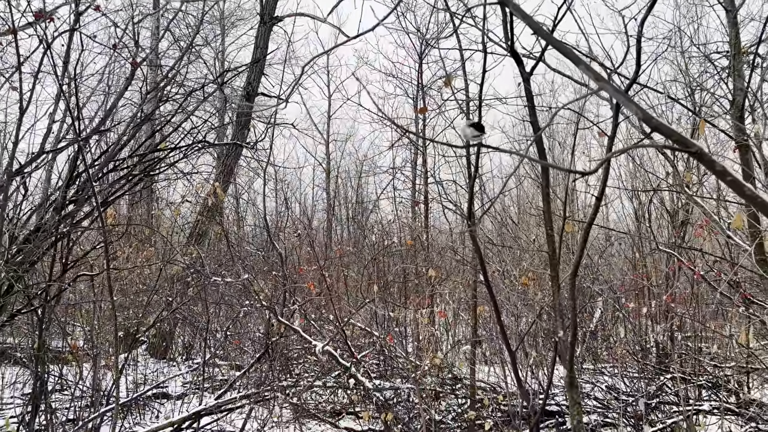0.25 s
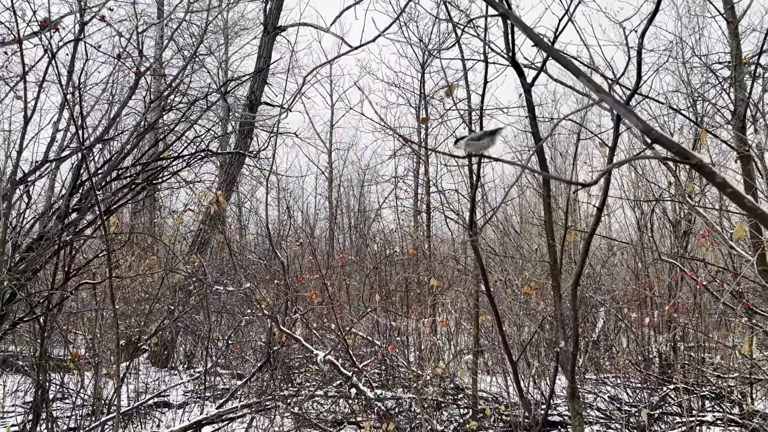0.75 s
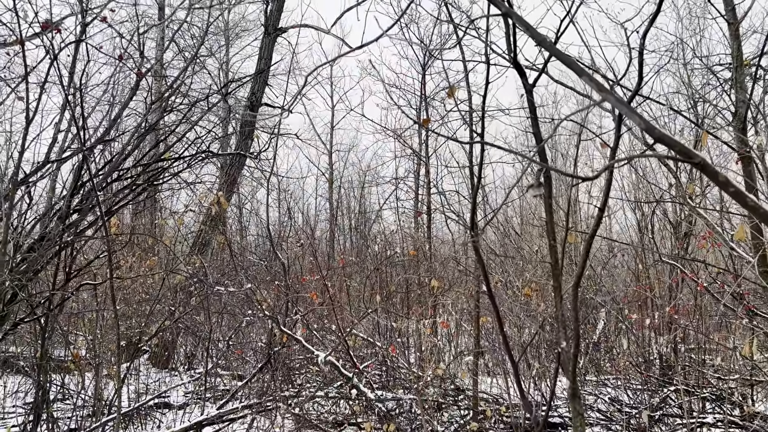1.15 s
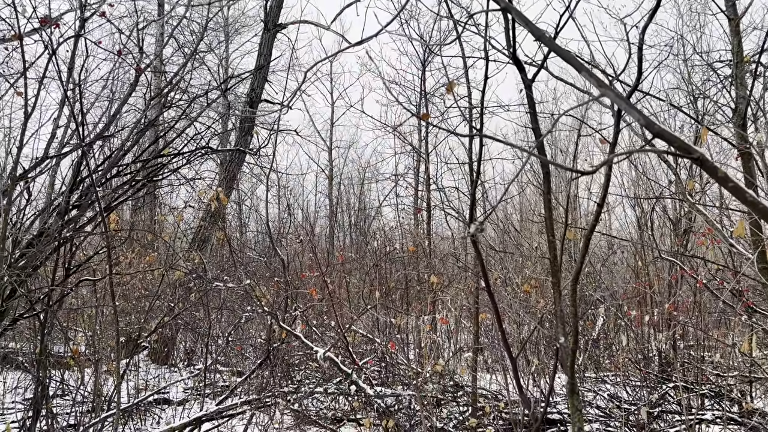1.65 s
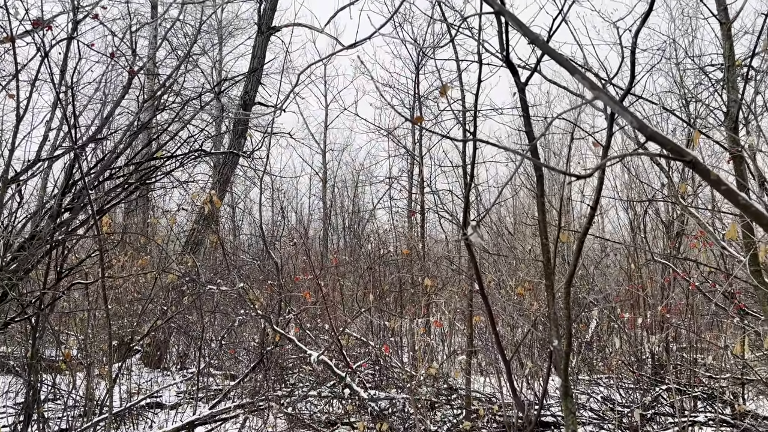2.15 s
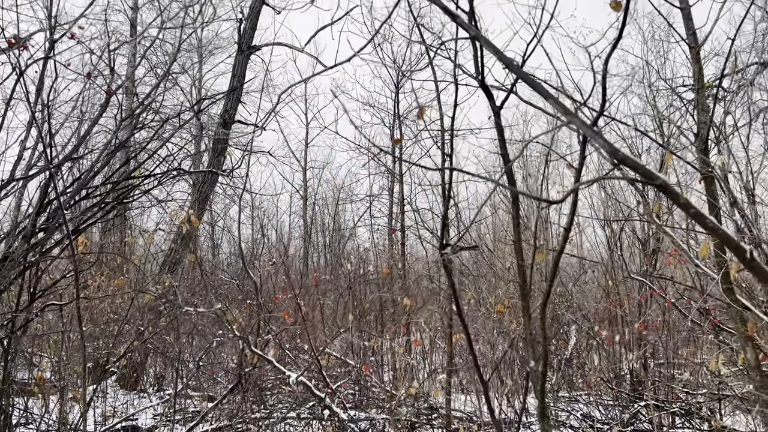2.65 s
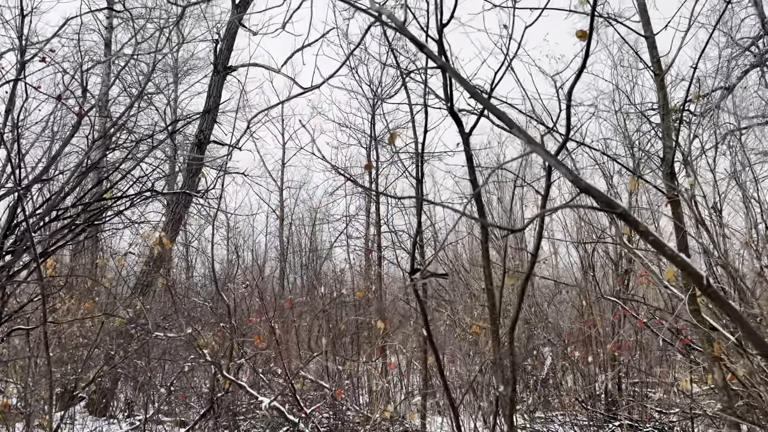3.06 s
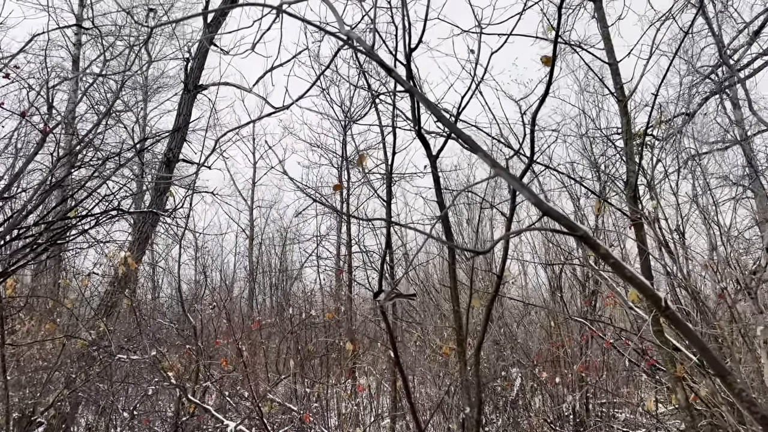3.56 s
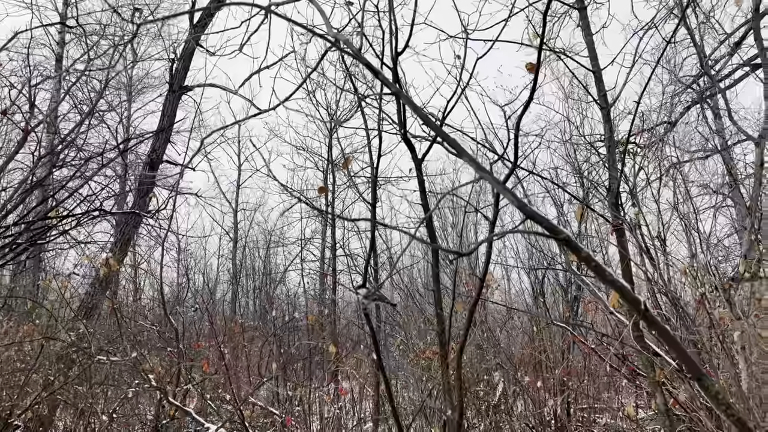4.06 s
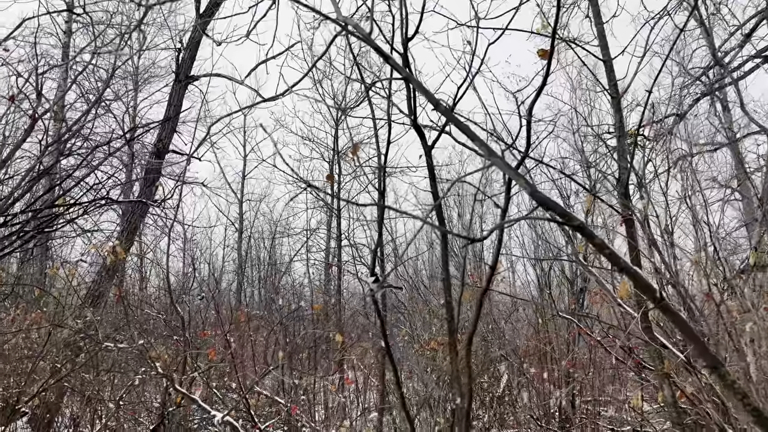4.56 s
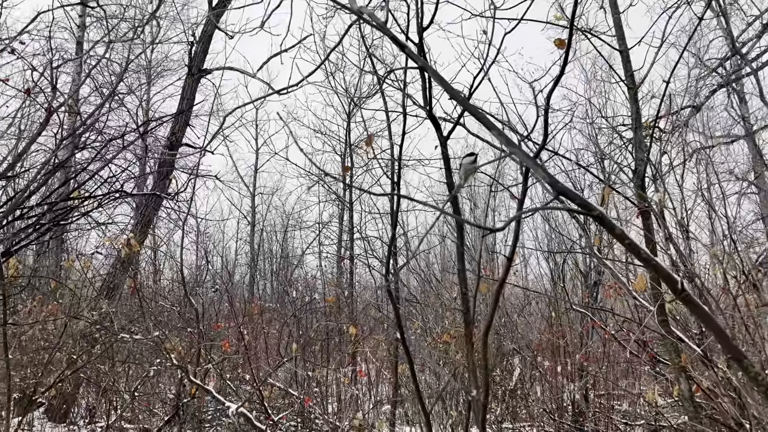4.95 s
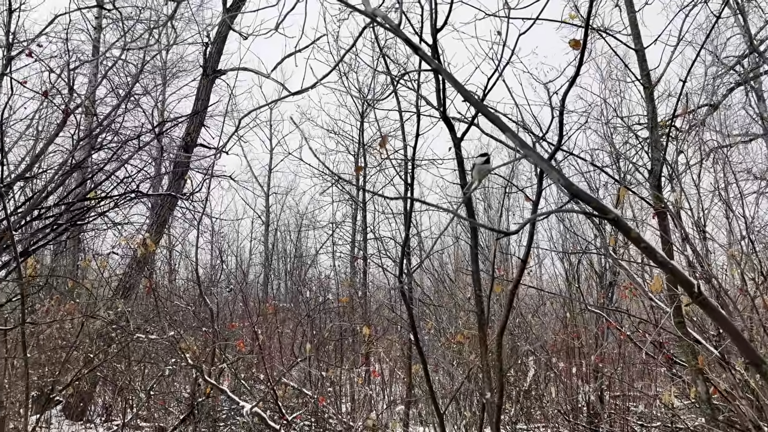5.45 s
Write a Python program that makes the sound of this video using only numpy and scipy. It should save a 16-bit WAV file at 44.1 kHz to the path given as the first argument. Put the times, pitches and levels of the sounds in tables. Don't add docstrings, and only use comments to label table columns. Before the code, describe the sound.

Handheld stereo pickup among bare snowy trees: two short pure whistles left of centre, tiny twig ticks and muffled wingbeats, then a quick chattering string of piercing chips sliding into buzzy nasal dee notes with short woodland echoes. Quiet follows, with low wind and extremely faint far birds. Fast wings whir before the last second, when drier, nearer chips and a final nasal call end the scene.

```python
import sys
import numpy as np
from scipy import signal
from scipy.fft import irfft
from scipy.io import wavfile
from scipy.ndimage import uniform_filter1d

SR = 44100
rng = np.random.default_rng(int(sys.argv[2]) if len(sys.argv) > 2 else 0)


def log_audio(samples):
    frames = np.atleast_2d(samples).T
    limited = np.clip(frames, -1, 1)
    pcm = np.round(limited * 32767).astype(np.int16)
    wavfile.write(sys.argv[1], SR, pcm)


def invert_db(level):
    return 10 ** (np.asarray(level, dtype=float) / 20)


N = 250929

PERCH_S = 5.0

# (start [s], length [s], top of fast voice [Hz], slow voice [Hz], level [dB])
FULL_CHIPS = [(1.413, 0.056, 7820, 2293, -31), (1.524, 0.04, 7374, 2206, -30.5),
              (1.628, 0.038, 7287, 2282, -29), (1.728, 0.035, 6980, 2206, -30.5)]
LEAN_CHIPS = [(1.478, 0.05, 8340, 2553, -38.5), (1.587, 0.041, 7750, 2555, -37),
              (1.691, 0.038, 7320, 2580, -33), (1.801, .036, 7220, 2405, -31.5),
              (5.46, 0.042, 7600, 2360, -32)]
LATE_CHIPS = [(5.136, 0.043, 7444, 2390, -46), (5.18, .057, 7685, 2607, -36.5),
              (5.345, .043, 8066, 2388, -30)]
THIN_CHIPS = [(5.134, 0.056, 8040, 2380, -48)]
FAR_CHIPS = [(0.678, 0.031, 7570, 2340, -82), (3.236, 0.032, 7320, 1860, -85.5),
             (3.412, 0.036, 7110, 1735, -82.5), (3.467, 0.033, 6850, 1900, -89),
             (3.577, 0.033, 6860, 1883, -78), (3.638, 0.032, 6680, 1920, -86.5)]
# (climb [Hz], scoop [share of climb], swell [dB], sum tones [dB])
FULL_MANNER = (850, 1.3, 1.3, 5.7)
LEAN_MANNER = (950.5, 1.6, -5, -0.5)
LATE_MANNER = (901, 0.9, -2, -1)
THIN_MANNER = (162, 5.5, -2, -30)
FAR_MANNER = (696, 0.5, -8, 0)
PLUNGE = [(.3, .58, 0.62), (.62, .88, 0.84), (1.001, 1, 0.97)]
# (time [s], fast voice [Hz], slow voice [Hz], level [dB])
ARCH = [
    (5.568, 2887, 2238, -58),
    (5.578, 4730, 2052, -40.5),
    (5.588, 5120, 1997, -37.5),
    (5.6, 4730, 1818, -39),
    (5.612, 3570, 1910, -44),
    (5.624, 2210, 1880, -64),
]
# (fast voice [multiple], slow voice [multiple], level [dB])
CHIP_TONES = [(1, 0, 0), (1, -1, -35), (0, 1, -40), (1, 1, -9.), (1, 2, -33.), (2, 0, -21.)]
LATE_TONES = [(2, -1.1, -31.5)]
ARCH_TONES = [(1, 0, 3), (1, 1, 3.5), (0, 1, -12), (2, 1, -13), (2, -1, -17), (0, 4, -14)]
FAR_TONES = [(1, 0, 4), (1, 0.89, -10.5)]
# (start [s], length [s], crest of fast voice [Hz], slow voice [Hz], level [dB])
GARGLES = [
    (1.829, .062, 3874, 2329, -42),
    (1.894, .085, 3226, 2033, -42),
]
GARGLE_MINUS_DB = [4, -3]
# (start [s], length [s], crest of fast voice [Hz], crest of slow voice [Hz], level [dB])
FIRST_DEE = [(1.965, 0.112, 1759, 2192, -43)]
DEES = [
    (2.134, 0.17, 1726, 2185, -44.5),
    (2.366, 0.17, 1681, 2142, -43.5),
    (2.61, .15, 1693, 2120, -45),
    (5.645, 0.18, 1663, 2164, -39),
]
DEE_CRESTS = [.55, .4, .28, 0.51]
DEE_HOARSE = [.2, .17, .42, .22]
# (frequency [Hz], level [dB])
THROAT = [(1200, -42), (1700, -17.5), (2150, -13), (2700, -9), (3400, -0.5), (4300, 2), (5100, -5),
          (6200, -11), (7100, -15.5), (7600, -39.5)]
# (time [s], change [dB], width [s])
LEVEL_SWAYS = [(1.42, -5, .012), (1.494, 0, 0.004), (1.602, 3.5, 0.0055), (1.616, -14.5, 0.0095),
               (1.702, 0.5, 0.0066), (1.718, -4.5, .008), (1.746, -10, 0.0031), (1.761, -12, 0.0024),
               (1.813, -3, 0.0012), (1.82, 2.5, .005), (1.834, -9, 0.0017), (1.838, 3.5, .002),
               (1.931, -5, .01), (2.064, 0, 0.0073), (2.139, -1, 0.011), (2.372, -4, 0.014), (2.62, 3, 0.012),
               (2.745, -2.5, 0.0088), (5.14, -6.5, 0.0054), (5.175, -5, 0.0019), (5.183, 6, .003),
               (5.211, 1, 0.0098), (5.355, -13, 0.0032), (5.371, -8.5, 0.0041), (5.388, 7.5, 0.0011),
               (5.39, 2.5, 0.0017), (5.461, -7, 0.0042), (5.471, 1.5, .004), (5.485, 1, 0.0035),
               (5.497, 2, 0.0015), (5.652, -3, 0.0067)]
# (time [s], pitch [Hz], level [dB], left minus right [dB])
FEE = [
    (0.0, 3272, -45, -10.5),
    (0.07, 3353, -42.5, -8),
    (0.096, 3283, -41.5, -9.5),
    (0.146, 3190, -52.5, -11.5),
    (0.165, 3290, -65.5, -7.5),
]
# (start [s], length [s], pitch [Hz], level [dB], left minus right [dB])
WHISTLES = [
    (.158, .2, 3250, -45.5, -9),
    (3.755, .145, 3370, -83, -6),
    (4.0, .1, 3370, -86, -3),
    (4.22, .11, 3400, -85, -3),
]
# (pitch [multiple], level [dB])
OVERTONES = [(2, -33.5), (3, -36.), (4, -43.)]

# (frequency [Hz], level [dB])
BEAK = [(2000, 0), (9500, 0), (10400, -1.5), (11100, -7.5), (11900, 4), (14000, 4.5), (16000, -1)]
# (frequency [Hz], left minus right [dB])
PORTS = [(2000, -1.5), (3250, -7.5), (4650, 3), (6050, 12), (6750, 6), (8150, 0), (9550, -8.5), (10300, -1),
         (15000, -1)]
LATE_PORTS = [(2000, -1.5), (3250, -9), (4650, -3), (6050, 5.5), (6750, 3), (8150, 3.5), (9550, -7),
              (10300, -2.5), (15000, 1)]
# (frequency [Hz], left leads [radians])
PORT_TURN = [(2000, 0.4), (3700, .5), (4650, 0), (6050, -1.6), (6800, -2), (8200, -2), (9550, -4),
             (10300, -2.5), (12500, -6), (15000, -5)]
LATE_TURN = [(2000, 1.4), (3250, -0.3), (4900, 1.43), (6050, 2.3), (6750, 0.7), (7400, 4.5), (8150, 4),
             (9300, 5), (10300, 4), (12100, 7.4), (14500, 6.5)]
# (frequency [Hz], level [dB])
SHADE = [(6900, 0), (7550, -7), (8200, 0), (10000, 0), (10900, -9), (11800, 0)]
# (frequency [Hz], time [s])
WOOD = [(500, .45), (3000, .45), (8000, .33), (10000, .2), (14000, .16)]
DEEP_WOOD = [(500, .7), (3000, .7), (7000, .62), (10000, .4), (14000, .25)]

# (time [s], push [dB], snap against push [dB], feather hiss against push [dB])
BEATS = [(0.859, -68, -7, -5.5), (0.886, -66.5, -1, -7), (1.02, -53.5, -3, -8), (1.052, -48, -5.5, -32),
         (1.084, -43.5, -10.5, -27), (1.233, -49, -7.5, -12), (1.267, -50.5, -5.5, -28),
         (1.487, -55, -4.5, 4.5), (2.282, -42, -5, -26), (2.6, -56.5, -30, -0.5), (2.749, -53.5, 2, -9),
         (3.607, -62, -0.5, -25), (4.557, -62, 0, 1), (4.591, -45, -22, -17.5), (4.634, -42.5, -13, -18.5),
         (4.664, -48.5, -14, -12.5), (4.719, -47, -13, -13.5), (4.76, -48.5, -3, -19),
         (4.8, -47, -2.5, -19), (4.842, -46, -7, -24), (4.879, -48, -6, -28), (5.2, -49.5, -39, -37)]
# (frequency [Hz], level [dB per Hz])
SNAP = [(300, -33), (700, 2.5), (1800, -4), (3500, -12.5), (6000, -19), (9000, -19), (14000, -24.5)]
RUSTLE = [(800, -15.5), (2000, 2.5), (5500, -4.5), (7500, -5.5), (8600, 0.5), (10700, -11.5), (12500, 0.5),
          (15500, -14)]
# (start [s], length [s], pitch [Hz], level [dB])
FLUTTERS = [
    (1.026, 0.11, 91.2, -60),
    (4.738, 0.182, 78, -56.5),
]
# (time [s], level [dB])
LANDING = [
    (2.6, -85),
    (2.66, -63),
    (2.74, -55),
    (2.8, -62),
    (2.9, -85),
]
# (frequency [Hz], level [dB per Hz])
BRAKE = [(1500, -14), (3000, -4), (6500, -3), (8800, 0), (10400, -6), (11500, -16), (16000, -24)]
# (start [s], length [s], level [dB])
MURMUR = (0.536, 0.17, -73)
# (frequency [Hz], level [dB per Hz])
MURMUR_COLOUR = [(900, -12), (1400, -16), (1750, 0.5), (2050, -10), (2350, -1.5), (2700, -13), (4000, -31)]
# (time [s], level [dB], centre [Hz], left minus right [dB])
TICKS = [(0.5197, -65, 13500, 1.0), (0.5197, -69, 9500, 1.0), (0.5916, -68, 12000, 4.0),
         (0.5916, -70, 7000, 4.0), (0.6363, -63, 8260, 1.5), (0.647, -69, 13500, 0.0),
         (0.828, -65, 13500, 0.0), (0.843, -67, 9000, 3.0), (0.913, -67, 12000, 2.0),
         (0.913, -68, 8000, 4.0), (0.9588, -51, 6400, 10.0), (1.0065, -64, 3500, 1.5),
         (1.12, -67, 12500, 0.0), (1.2105, -56, 7020, 5.5), (1.2319, -58, 12100, 0.5),
         (1.3473, -59, 13500, 2.5), (1.3473, -61, 9500, 2.5), (1.3473, -61, 5000, 2.5),
         (1.3843, -64, 9620, 0.0), (1.3843, -66, 5500, 0.0), (3.0194, -61, 13200, 5.0),
         (3.2316, -57, 13800, 3.0), (3.6094, -63, 6330, 11.0), (3.8594, -70, 8140, 6.5),
         (4.0924, -59, 3400, 6.0), (4.0924, -63, 7500, 6.0), (4.4894, -65, 6320, 9.5),
         (4.554, -58, 5200, 5.0), (4.6148, -56, 2770, 1.5), (4.654, -60, 4500, 3.0),
         (4.7619, -52, 1800, 4.0), (4.8008, -57, 2020, 3.0), (4.8422, -60, 4780, 5.0),
         (4.8422, -55, 1300, 2.0), (4.881, -60, 1500, 2.0), (4.9746, -70, 6320, 11.0)]
# (start [s], length [s], level [dB])
SWISH = (4.122, .05, -72.)

# (time [s], level [dB])
GUSTS = [(0.0, -71.5), (0.36, -73.5), (0.81, -67), (1.24, -67), (2.14, -63.5), (2.789, -65.5),
         (3.299, -71.5), (3.88, -62.5), (4.63, -63.5), (4.76, -60), (4.9, -72.5), (5.69, -69)]
# (frequency [Hz], level [dB per Hz])
RUMBLE = [(12, -40), (22, -21), (48, -3), (178, -4.5), (285, -4.5), (323, -2.5), (439, -12), (826, -12.5),
          (1500, -22), (2400, -35), (3300, -55), (5000, -120)]
AIR = [(800, -20), (1300, 0), (3000, -3), (5000, -6), (6500, -3), (8500, -5), (10500, -14), (13000, -11),
       (15800, -18)]
# (frequency [Hz], left minus right [dB])
AIR_PAN = [(1500, -1), (3500, 3), (5500, 10), (8500, 8), (11000, 0)]
# (frequency [Hz], likeness [0 to 1])
SAME = [(40, 0.83), (250, 0.79), (600, 0.081), (1500, 0.16), (8000, 0.94), (14000, 0.79)]


def birds():
    t = np.arange(N) / SR
    near = near_calls()
    near *= invert_db(sum(db * np.exp(-((t - s) / width) ** 2) for s, db, width in LEVEL_SWAYS))
    first, later = near * (t < PERCH_S), near * (t >= PERCH_S)
    near = ports(first, PORTS, PORT_TURN) + ports(later, LATE_PORTS, LATE_TURN)
    far = shaded(far_calls() * invert_db([[2.5], [-8.]]))
    pure = whistlers()
    sent = invert_db(-6.5 - 7 * (t > PERCH_S)) * near
    echoes = wood(sent + invert_db(-19.5) * pure, WOOD) + wood(invert_db(7.5) * far, DEEP_WOOD, close=2.6)
    return near + invert_db(-1.0) * far + pure + echoes


def near_calls():
    near = np.zeros(N)
    # chips, their manner, then octave tones [dB], lower side tones [dB] and final fade [dB]
    kinds = ((FULL_CHIPS, FULL_MANNER, -5., 0., 21.),
             (LEAN_CHIPS, LEAN_MANNER, -6., -3., 27.),
             (LATE_CHIPS, LATE_MANNER, -4.5, -4., 31.),
             (THIN_CHIPS, THIN_MANNER, -1.5, -7., 31.))
    for table, (*manner, sum_db), octave_db, under_db, fade_db in kinds:
        for row in table:
            tones = chip_tones(row[0], row[-1], sum_db, octave_db, under_db)
            add(near, *chip(chip_shape(*row, *manner), tones, fade_db=fade_db))
    add(near, *chip(ARCH, ARCH_TONES, haze=.22))
    for row, minus_db in zip(GARGLES, GARGLE_MINUS_DB):
        add(near, *buzz(gargle_shape(*row), fast_db=-1.5, slow_db=3.0, minus_db=minus_db,
                        alone_db=9.0, broken_db=-0.7))
    add(near, *buzz(dee_shape(*FIRST_DEE[0], crest=0.0495, hoarse=.33)))
    for row, crest, hoarse in zip(DEES, DEE_CRESTS, DEE_HOARSE):
        add(near, *buzz(dee_shape(*row, crest, hoarse)))
    return near


def chip_tones(start, level_db, sum_db, octave_db, under_db):
    tones = []
    for m, n, db in CHIP_TONES + LATE_TONES * (start > PERCH_S):
        db = db + sum_db * (m + n > 1) + octave_db * (m > 1)
        db += under_db * (m < 2 and n not in (0, m))
        db += 0.73 * (level_db + 33.5) * (n != 0)
        tones.append((m, n, db))
    return tones


def chip_shape(start, length, top_hz, slow_hz, db, climb_hz, scoop, swell_db):
    t = np.linspace(0, length, num=40)
    u = t / length
    climb = climb_hz * (0.043 / length) ** 2.1
    fast = top_hz - climb * ((1 - u) ** 1.8 + scoop * np.exp(-t / .003))
    slow = slow_hz + 291 * (.5 - u)
    level = db - 20.5 * np.exp(-t / 0.0026) - swell_db * (1 - u)
    return np.c_[start + t, fast, slow, level]


def chip(rows, tones, drop_s=.012, end_hz=3100, fade_db=23., haze=.09):
    end_s, end_fast, end_slow, end_db = rows[-1]
    drop_hz = max(end_fast - end_hz, 0)
    tail = [(end_s + k * drop_s, end_fast - j * drop_hz, end_slow, end_db - fade * fade_db)
            for k, j, fade in PLUNGE]
    s, (fast, slow, db) = columns(list(rows) + tail)
    count = len(db)
    p = angle(fast * (1 + 0.0056 * wobble(count, 60)))
    q = angle(slow * (1 + 0.01122 * wobble(count, 60)))
    closing = np.clip((s + np.arange(count) / SR - end_s) / 0.0006, 0, 1)
    mix = np.zeros(count)
    for m, n, tone_db in tones:
        gain = invert_db(tone_db + 4.5 * closing * (n > 0))
        mix += gain * np.sin(m * p + n * q) * (m * fast + n * slow < SR / 2)
    rasp = (haze + .3 * closing) * wobble(count, size=14)
    spit = (0.01 + 0.077 * closing) * rng.standard_normal(count)
    mix *= 1 + rasp + spit
    mix = signal.sosfilt(signal.butter(2, 1800, "high", fs=SR, output="sos"), mix)
    return s, np.sqrt(2) * invert_db(db + wobble(count, 150)) * mix * signal.windows.tukey(count, .08)


def gargle_shape(start, length, crest_hz, slow_hz, db):
    t = np.linspace(0, length, num=60)
    u = t / length - 0.37
    foot_hz = np.where(u < 0, .82 * crest_hz, 1764)
    lift = np.exp(-(u / np.where(u < 0, .12, .25)) ** 2)
    fast = foot_hz + (crest_hz - foot_hz) * lift
    level = db + 8.5 * lift - 9.6 * edges(t, length, 0.0048, 0.0031)
    rough = np.clip(.48 - .42 * lift, 0, .9)
    return np.c_[start + t, fast, slow_hz + 0 * t, level, rough]


def dee_shape(start, length, fast_hz, slow_hz, db, crest, hoarse):
    t = np.linspace(0, length, num=60)
    slack = bow(t / length, crest)
    pitches = np.outer(1 - 0.13 * slack, [fast_hz, slow_hz])
    level = db - 1.5 * slack - 18.5 * edges(t, length, 0.0035, 0.0042)
    return np.c_[start + t, pitches, level, np.clip(hoarse + .3 * slack, 0, .9)]


def buzz(rows, fast_db=2.0, slow_db=2.0, minus_db=3.5, alone_db=-2.5, broken_db=2.):
    s, (fast, slow, db, rough) = columns(rows)
    count = len(db)
    p, q = (angle(v * (1 + .018 * rough * wobble(count, 40) + .008 * wobble(count, 350)))
            for v in (fast, slow))
    mix = np.zeros(count)
    for m in range(-2, 6):
        for n in range(-2, 5):
            hz = m * fast + n * slow
            loss_db = fast_db * abs(m) + slow_db * abs(n)
            loss_db += minus_db * (min(m, n) < 0)
            loss_db += alone_db * (m * n == 0 and m + n > 1)
            waver_db = broken_db * np.clip(hz / 4000, .5, 2) ** 2 * wobble(count, size=300)
            gain = (hz > 0) * invert_db(read(THROAT, hz) - loss_db + waver_db)
            mix += gain * np.cos(m * p + n * q + 6 * rng.random())
    clear = evened(mix)
    rasp = clear * np.tanh(1.3 * wobble(count, size=18))
    rasp += 0.038 * clear * rng.standard_normal(count)
    power = uniform_filter1d(mix ** 2, size=110, mode="reflect") / np.mean(mix ** 2)
    voice = (np.sqrt(1 - rough ** 2) * clear + rough * rasp) / np.sqrt(power)
    return s, invert_db(db) * voice * signal.windows.tukey(count, .05)


def far_calls():
    far = np.zeros(N)
    for row in FAR_CHIPS:
        shape = chip_shape(*row, *FAR_MANNER[:-1])
        add(far, *chip(shape, FAR_TONES, fade_db=42.0, drop_s=0.0011, end_hz=5970))
    return far


def whistlers():
    pure = np.zeros((2, N))
    for rows in [FEE] + [whistle_shape(*row) for row in WHISTLES]:
        add(pure, *whistle(rows))
    return pure


def whistle_shape(start, length, hz, db, pan_db):
    t = np.linspace(0, length, num=80)
    level = db - 16.5 * edges(t, length, 0.015, 0.0016)
    pitch = hz * (1 - 0.0054 * bow(t / length, .55))
    return np.c_[start + t, pitch, level, pan_db + 0 * t]


def whistle(rows):
    s, (hz, db, pan_db) = columns(rows)
    count = len(db)
    a = angle(hz * (1 + 0.0046 * wobble(count, 200)))
    tone = np.sin(a) + sum(invert_db(d) * np.sin(k * a) for k, d in OVERTONES)
    i = np.arange(count)
    fade = np.clip(np.minimum(i[::-1], i + 200 * (s < .01)) / 200, 0, 1)
    fade = fade * invert_db(1.15 * wobble(count, size=500))
    return s, np.sqrt(2) * invert_db(db + np.outer([.5, -.5], pan_db)) * tone * fade


def edges(t, length, rise_s, fall_s):
    return np.exp(-t / rise_s) + np.exp((t - length) / fall_s)


def bow(u, crest):
    return np.where(u < crest, (crest - u) / .5, (u - crest) / (1 - crest)) ** 2


def wings():
    t, shapes = np.arange(SR // 5) / SR, np.zeros((3, N))
    u = t / np.array([[.008], [.003], [.017]])
    for s, db, snap_db, rustle_db in BEATS:
        add(shapes, s, invert_db([[db], [db + snap_db], [db + rustle_db]]) * u * np.exp(1 - u))
    push = coloured([(25, -54), (45, -22), (78, 1.5), (250, -3.5), (450, -12.0), (900, -43.5),
                     (2000, -73.0)], same=[(30, 1.0), (900, 0.63)])
    snap = coloured(SNAP, same=[(500, 0.86), (4000, 0.24)])
    hiss = coloured(RUSTLE, pan=AIR_PAN)
    return .5 * (shapes[0] * push + shapes[1] * snap + shapes[2] * hiss)


def flutters():
    out = np.zeros(N)
    for s, length, hz, db in FLUTTERS:
        count = round(length * SR)
        tone = np.sin(angle(hz * (1 + 0.042 * wobble(count, size=600))))
        add(out, s, np.sqrt(2) * invert_db(db) * signal.windows.tukey(count, .5) * tone)
    return out


def landing():
    db = np.interp(np.arange(N) / SR, *np.transpose(LANDING), left=-200, right=-200)
    return .4 * invert_db(db) * coloured(BRAKE, pan=AIR_PAN)


def far_murmur():
    s, length, db = MURMUR
    u = np.clip((np.arange(N) / SR - s) / length, 0, 1)
    return invert_db(db) * np.sin(np.pi * u ** 0.64) * coloured(MURMUR_COLOUR, SAME)


def ticks():
    out, t = np.zeros((2, N)), np.arange(400) / SR
    u = t / .001
    for s, db, hz, pan_db in TICKS:
        snap = rng.standard_normal(400)
        snap = evened(uniform_filter1d(uniform_filter1d(snap, size=9), size=9))
        sound = np.sin(2 * np.pi * hz * t) * snap * u * np.exp(1 - u)
        add(out, s, invert_db(db - 9 + np.array([[.5], [-.5]]) * pan_db) * sound)
    return out


def swish():
    s, length, db = SWISH
    u = np.clip((np.arange(N) / SR - s) / length, 0, 1)
    hiss = coloured([(7000, -30), (10800, -8), (12000, 0), (15000, -3), (16000, -15)],
                    same=[(1, .8), (2, .8)])
    return invert_db(db) * np.sin(np.pi * u ** 0.46) * hiss


def wash():
    gust_db = np.interp(np.arange(N) / SR, *np.transpose(GUSTS)) + 1.7
    rumble = invert_db(gust_db) * coloured(RUMBLE, SAME, AIR_PAN, patchy_db=2.5)
    return rumble + invert_db(-80) * coloured(AIR, SAME, AIR_PAN, patchy_db=-0.5)


def wood(x, decay, close=3.24):
    taps = np.zeros((2, SR // 2))
    slots = np.arange(round(0.0022 * SR), SR // 2 - 40, 40)
    at = slots + rng.integers(0, 40, (2, len(slots)))
    np.put_along_axis(taps, at, rng.choice([-1., 1.], at.shape), 1)
    hz, t, z = signal.stft(taps, SR, nperseg=128)
    near = 1 + close * np.exp(-t / 0.011)
    dying = invert_db(-60 * t / read(decay, hz)[:, None])
    tail = signal.istft(z * near * dying, SR, nperseg=128)[1]
    return signal.fftconvolve(x, tail / np.linalg.norm(tail[0]), axes=1)[:, :N]


def ports(x, balance, turn):
    hz = np.fft.rfftfreq(512, 1 / SR)
    half = invert_db(read(balance, hz) / 2) * np.exp(.5j * read(turn, hz))
    loudness = np.sqrt((abs(half) ** 2 + abs(half) ** -2) / 2)
    response = np.array([half, 1 / half]) * invert_db(read(BEAK, hz)) / loudness
    taps = np.roll(irfft(response), 256, axis=1) * np.hanning(512)
    return signal.oaconvolve(x[None], taps, axes=1)[:, 256:256 + N]


def shaded(x):
    response = invert_db(read(SHADE, np.fft.rfftfreq(256, 1 / SR)))
    taps = np.roll(irfft(response), 128) * np.hanning(256)
    return signal.oaconvolve(x, taps[None], axes=1)[:, 128:128 + N]


def coloured(points, same=((1, 0.), (2, 0.)), pan=((1, 0.), (2, 0.)), patchy_db=0.0):
    frames, hz = N // 256 + 5, np.fft.rfftfreq(1024, 1 / SR)
    a, b, c, d, patch = rng.standard_normal((frames, 513, 5)).T
    patch = evened(uniform_filter1d(uniform_filter1d(patch, size=12, axis=0), size=14, axis=1))
    alike = np.clip(read(same, hz), -1, 1)[:, None]
    half = invert_db(read(pan, hz) / 2)[:, None]
    left, other = a + 1j * b, c + 1j * d
    right = alike * left + np.sqrt(1 - alike ** 2) * other
    z = np.array([left * half, right / half])
    z *= invert_db(read(points, hz)[:, None] + patchy_db * patch)
    return evened(signal.istft(z, nperseg=1024, noverlap=768)[1][:, :N])


def wobble(count, size):
    noise = rng.standard_normal(count + 2 * size)
    return evened(uniform_filter1d(uniform_filter1d(noise, size), size)[size:-size])


def angle(hz):
    return 2 * np.pi * (np.cumsum(hz) / SR + rng.random())


def columns(rows):
    s, *rest = np.transpose(rows)
    t = np.arange(s[0], s[-1], 1 / SR)
    return s[0], [uniform_filter1d(np.interp(t, s, c), size=90, mode="nearest") for c in rest]


def read(points, hz):
    f, value = np.transpose(points)
    return np.interp(np.log(np.abs(hz) + 1), np.log(f + 1), value)


def evened(x):
    return x / np.sqrt(np.mean(x ** 2) + 1e-20)


def add(mix, s, sound):
    part = mix[..., max(round(s * SR), 0):][..., :sound.shape[-1]]
    part += sound[..., :part.shape[-1]]


def scene():
    distant = shaded(wings() + landing() + far_murmur() + wash())
    return birds() + distant + flutters() + ticks() + swish()


def top_cut(x):
    return signal.sosfilt(signal.butter(12, 15830, fs=SR, output="sos"), x)


def record(dry):
    low_pass = signal.firwin(401, 15750, window=("kaiser", 9), fs=SR)
    narrow = signal.oaconvolve(dry, low_pass[None], "same")
    return top_cut(narrow)


dry = scene()
out = record(dry)
log_audio(out)
```